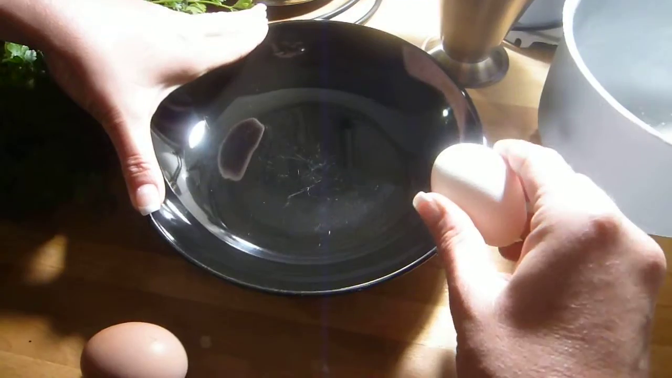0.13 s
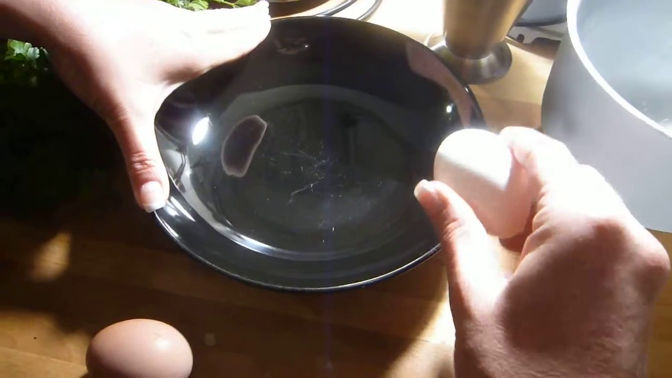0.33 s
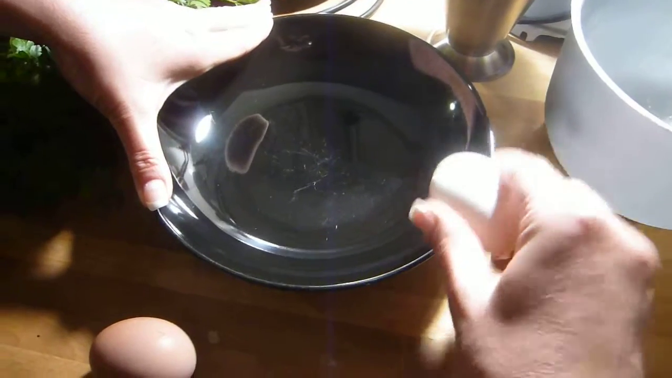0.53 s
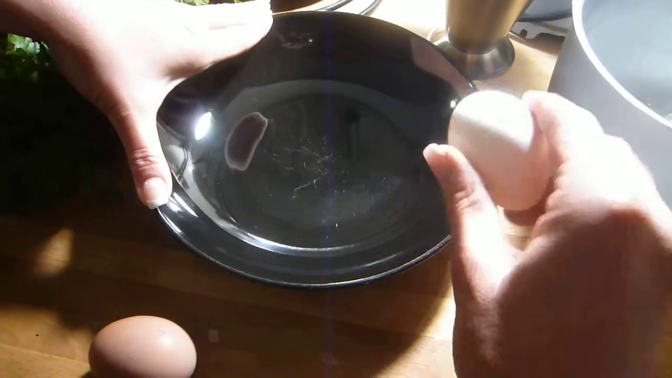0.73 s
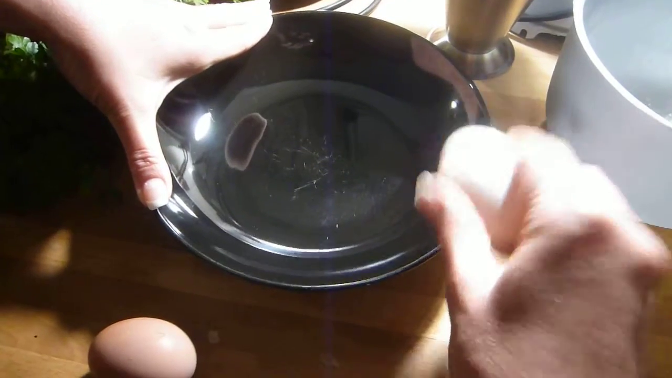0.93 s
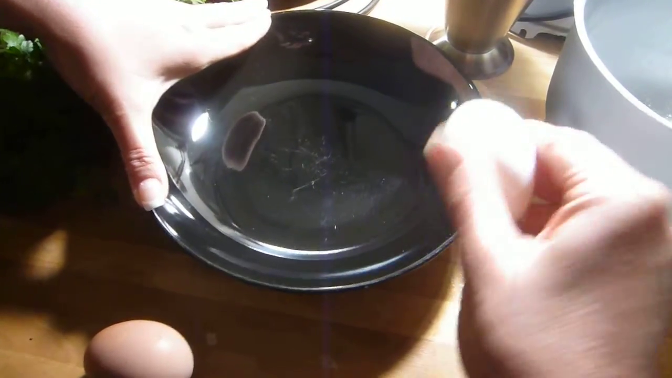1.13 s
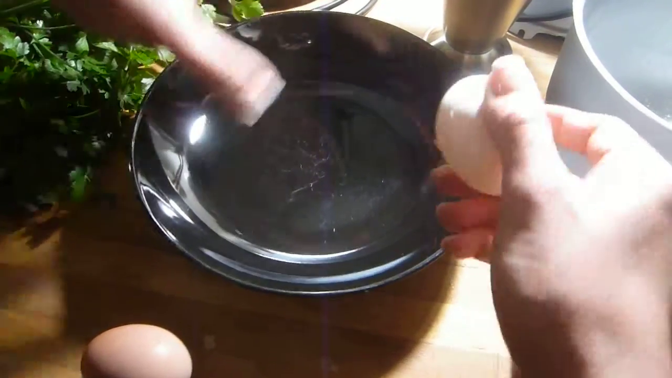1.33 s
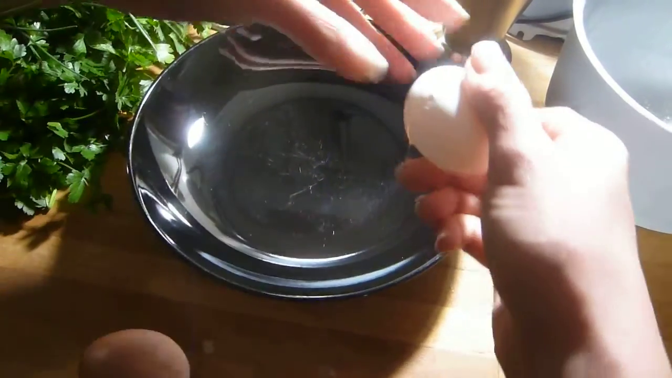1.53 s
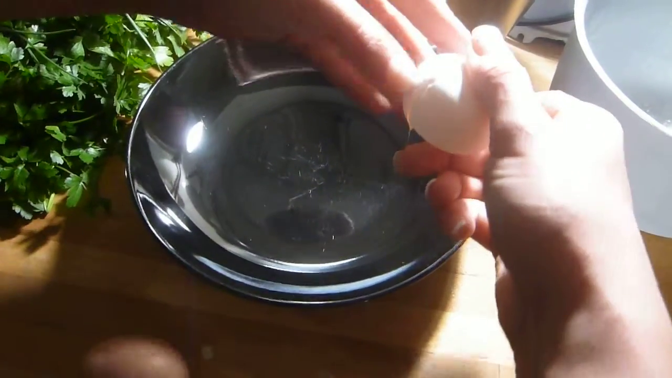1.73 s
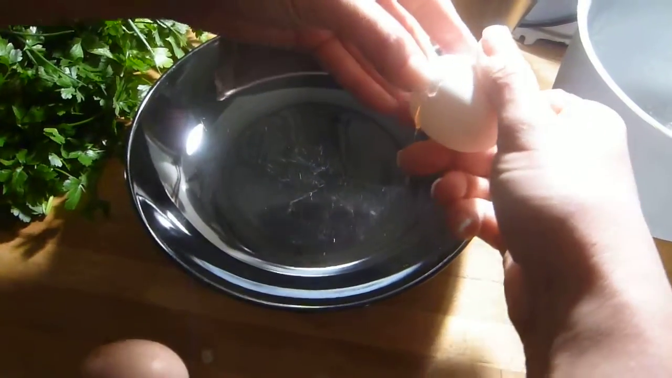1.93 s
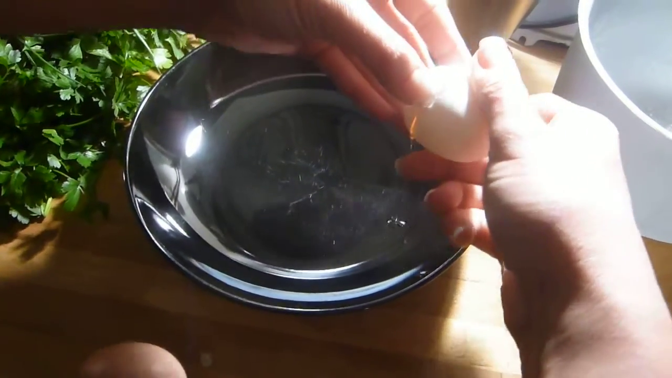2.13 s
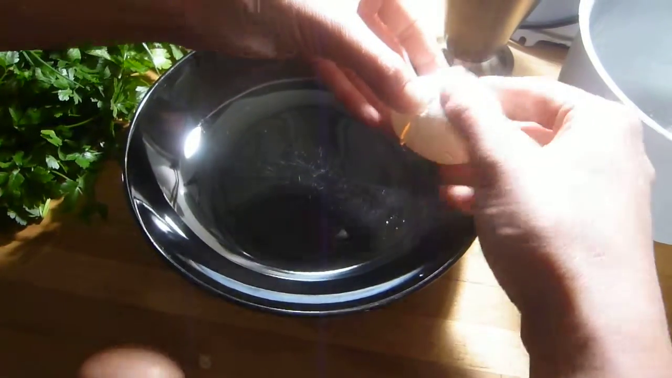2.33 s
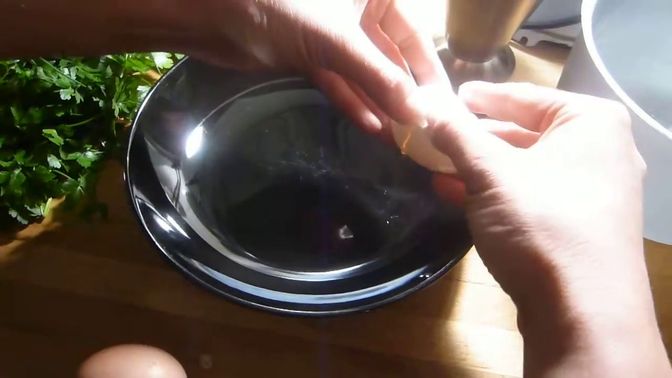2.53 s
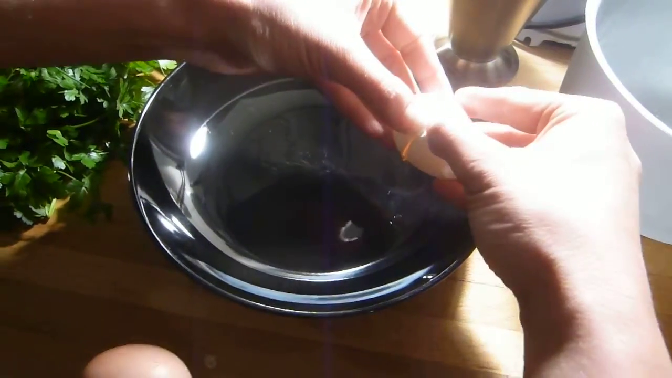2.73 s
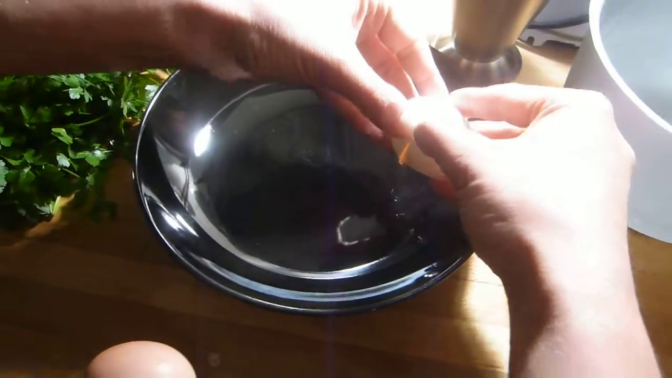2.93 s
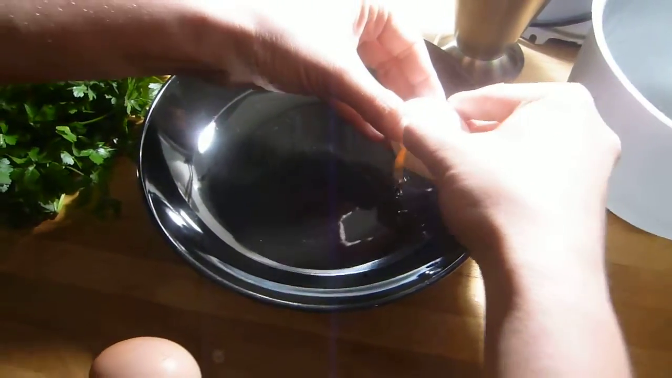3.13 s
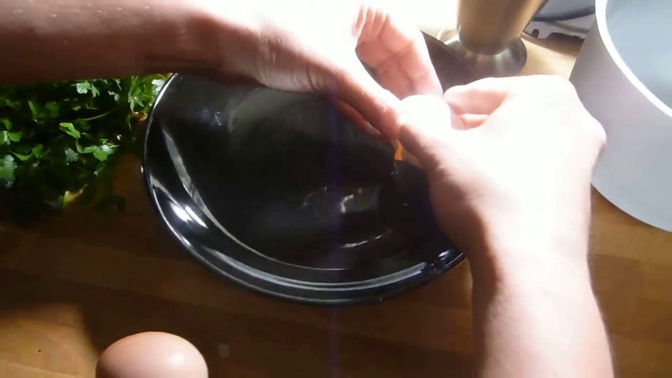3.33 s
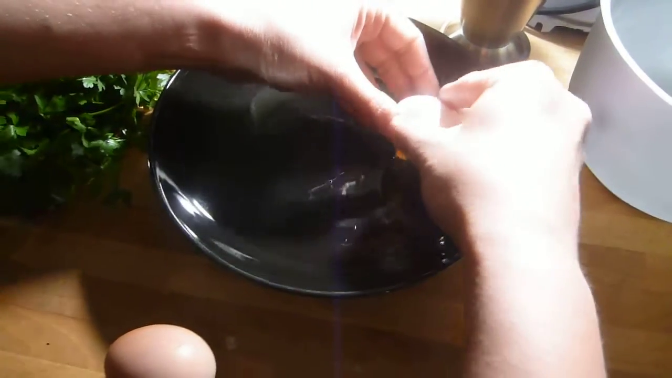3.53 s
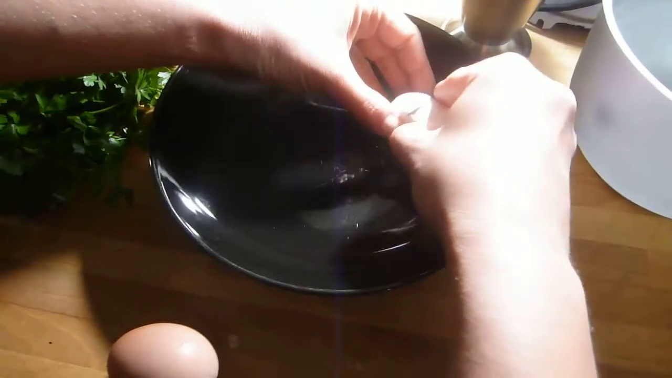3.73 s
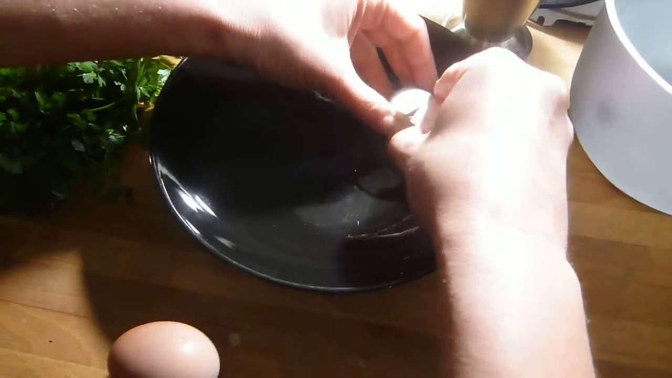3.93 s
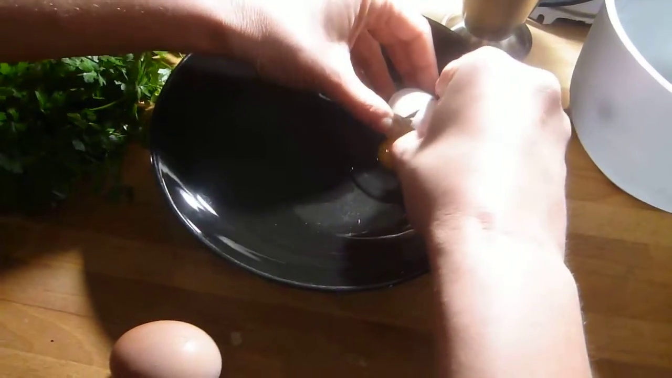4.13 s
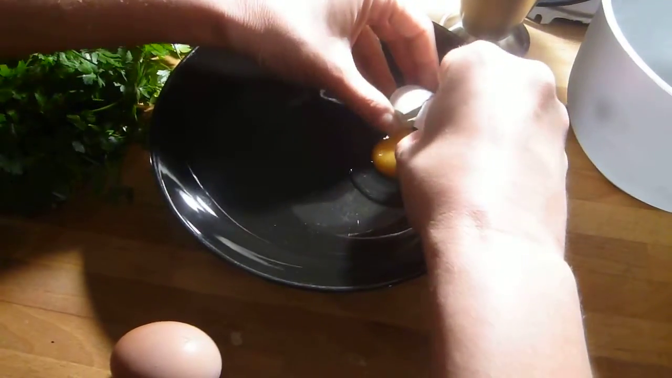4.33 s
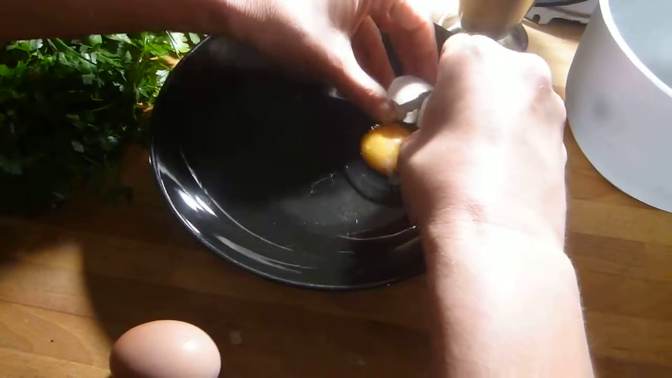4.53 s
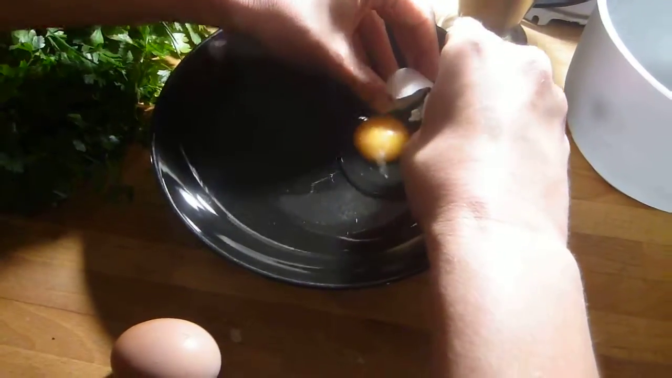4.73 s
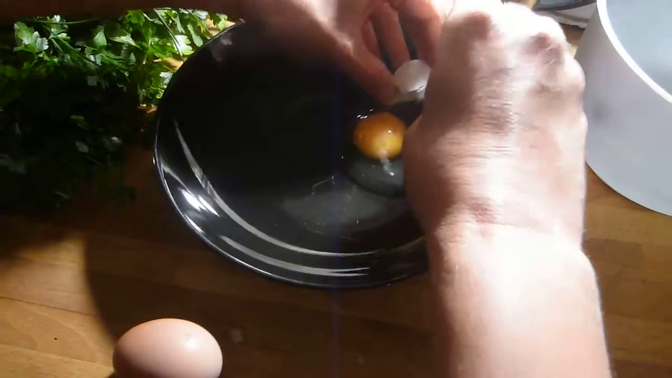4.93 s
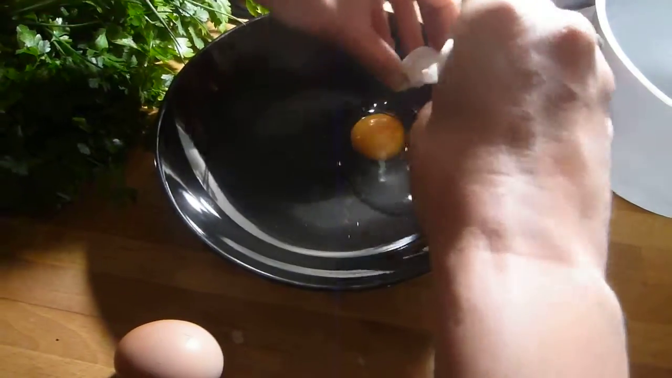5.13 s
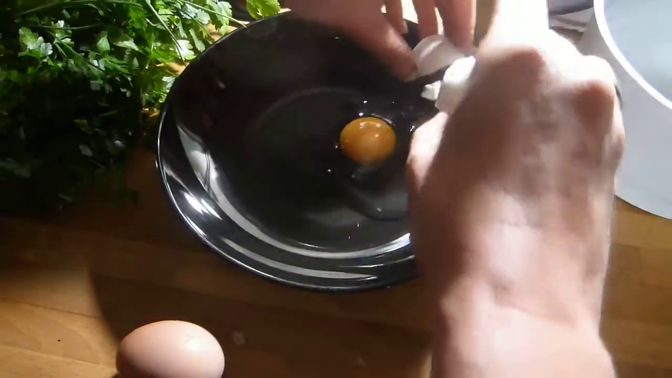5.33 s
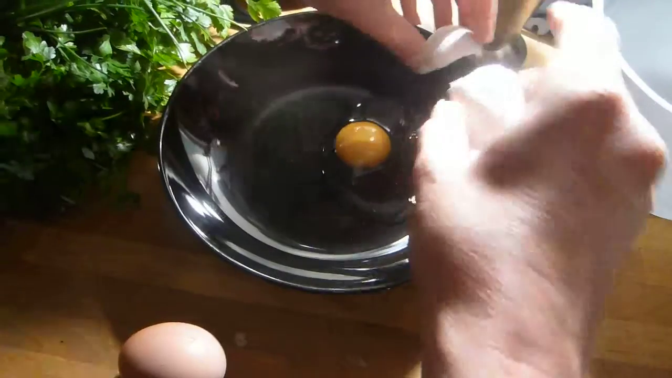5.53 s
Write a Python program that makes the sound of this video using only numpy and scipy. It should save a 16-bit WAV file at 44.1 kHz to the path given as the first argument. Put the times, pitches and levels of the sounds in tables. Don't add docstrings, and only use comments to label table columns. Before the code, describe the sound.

Two sharp, crunchy egg knocks ring through wood, followed by handling thumps and a brief burst of brittle shell cracking.

```python
import sys
import numpy as np
from scipy import signal
from scipy.io import wavfile

SR = 44100
rng = np.random.default_rng(int(sys.argv[2]) if len(sys.argv) > 2 else 0)


def wav_record(signal):
    frames = np.transpose(np.atleast_2d(signal))
    bounded = np.clip(frames, -1, 1)
    quanta = np.round(bounded * 32767).astype(np.int16)
    wavfile.write(sys.argv[1], SR, quanta)


def volts(x):
    e = np.asarray(x, float) / 20
    return 10 ** e


N = 245637


def rms_one(x):
    return x / np.sqrt(np.mean(x ** 2) + 1e-20)


def at_hz(points, hz):
    curve_hz, value = np.array(points).T
    return np.interp(np.log(hz), np.log(curve_hz), value)


def drift(rate_hz):
    knots_per_s = 200
    knots = rng.standard_normal(int(N / SR * knots_per_s) + 400)
    r = np.exp(-2 * np.pi * rate_hz / knots_per_s)
    slow = rms_one(signal.lfilter([1], [1, -2 * r, r * r], knots)[300:])
    return np.interp(np.arange(N) / SR * knots_per_s, np.arange(len(slow)), slow)


def ring(clicks, hz, t60_s):
    r = volts(-60 / (max(t60_s, .001) * SR))
    w = 2 * np.pi * hz / SR
    return signal.lfilter([0, np.sin(w)], [1, -2 * r * np.cos(w), r * r], clicks + 1e-18)


def modes_ring(clicks, modes):
    return sum((-1) ** k * volts(db) * ring(clicks, hz, t60_s) for k, (hz, t60_s, db) in enumerate(modes))


def high_pass(x, hz):
    return signal.sosfilt(signal.butter(2, hz, "high", fs=SR, output="sos"), x)


def add(out, start_s, piece):
    i = int(start_s * SR)
    out[i:i + len(piece)] += piece[:N - i]


def bands(spectrum, size, gain_at):
    edges = 25 * 2 ** np.arange(0, 8.7, 1 / 3)
    centres = np.sqrt(edges[1:] * edges[:-1])
    levels = volts(at_hz(spectrum, centres))
    levels = levels / np.sqrt(np.sum(levels ** 2 * np.diff(edges)) * 2 / SR)
    white = rng.standard_normal((2, size + 4000))
    out = np.zeros(size)
    for k, hz in enumerate(centres):
        sos = signal.butter(2, edges[k:k + 2], "band", fs=SR, output="sos")
        out += levels[k] * gain_at(hz) * signal.sosfilt(sos, white[k % 2])[-size:]
    return out


# pitch_hz, level_db (per Hz)
HISS_COLOUR = [(15, -34), (25, -1), (130, 3), (418, -14), (472, -10), (712, -9), (930, -22.5),
               (1030, -16.5), (1160, -17.5), (1280, -36.5), (1440, -12.5), (2460, -18), (6980, -26.5),
               (8270, -27.5), (10800, -71.5), (18200, -120)]


def hiss():
    together = drift(7.1)

    def lumps(hz):
        depth_db = 0.5 + 400 / (hz + 100)
        return volts(depth_db * (.5 * together + drift(15.0)))

    return volts(-54) * bands(HISS_COLOUR, N, lumps)


# start_s, level_db
HANDS = [(0, 1.5), (.14, 4.5), (.4, -5), (.65, 4.5), (0.951, -2), (1.2, 3.5), (1.45, -0.5), (1.7, 2.5),
         (2.1, 3.5), (3.0, 0.5), (3.699, 3.5), (3.85, -3), (4.0, 2.5), (4.42, -0.5), (4.52, -4), (4.7, -1),
         (5.3, 0.5), (5.57, 0.5)]


def hands_db():
    return np.interp(np.arange(N) / SR, *np.transpose(HANDS))


# pitch_hz, level_db (per Hz)
RUMBLE_COLOUR = [(60, -35), (150, 4), (250, -2), (400, -0.5), (600, -5.5), (1200, -40)]


def rumble():
    lumps = bands(RUMBLE_COLOUR, N, lambda hz: volts(3.67 * drift(2.5)))
    return volts(-61.5 + 1.3 * hands_db()) * lumps


# pitch_hz, t60_s, level_db
CASING_MODES = [(863, 0.019, -1.5), (903, 0.053, -5), (1140, 0.034, -5.5), (1480, 0.017, -3.5),
                (1852, 0.034, -11), (2146, 0.033, -13.5)]


def rubbing():
    born = rng.random(N) < 900 * volts(8.0 * drift(16.0)) / SR
    strength = volts(4.1 * np.minimum(rng.exponential(1, N), 4))
    slips = born * strength * rng.choice([-1, 1], N)
    dealt = rng.integers(0, len(CASING_MODES), N)
    rubbed = np.zeros(N)
    for k, (hz, t60_s, db) in enumerate(CASING_MODES):
        rubbed += volts(db) * ring(slips * (dealt == k), hz, t60_s)
    return volts(-59 + hands_db()) * rms_one(rubbed)


# start_s, peak_db, pitch_hz, second_slip_wait_s (0 = none)
CREAKS = [(.152, -38.5, 1100, .036), (.286, -38, 1044, .056), (.443, -38.5, 896, 0),
          (.848, -39.5, 1070, 0.044), (1.39, -41, 1170, 0.025), (1.486, -41.5, 1080, 0.06),
          (1.726, -43, 1140, 0.022), (1.871, -39, 992, 0.046), (1.965, -40, 980, 0.038),
          (2.314, -44, 870, .054), (2.451, -39.5, 1130, 0.051), (2.79, -42, 1150, 0.07),
          (3.014, -38.5, 899, 0.017), (3.247, -39, 890, .045), (3.36, -37.5, 1180, 0.059),
          (3.599, -39, 1480, 0.066), (3.91, -36.5, 980, 0.059), (3.998, -36.5, 956, 0.048),
          (4.17, -35.5, 1130, 0.029), (4.291, -41, 930, 0.031), (4.301, -30, 897, .049),
          (4.386, -37, 980, .03), (4.44, -40.5, 960, .016), (4.585, -39.5, 1080, .026),
          (4.65, -36.5, 950, .046), (4.791, -38, 977, 0.038), (4.944, -34, 892, 0.044),
          (5.076, -35.5, 1110, 0.084), (5.317, -40, 1110, 0.011), (5.434, -38, 970, 0.059)]


def creaks():
    out = np.zeros(N)
    again = [(s + wait_s, peak_db - 2, hz, 0) for s, peak_db, hz, wait_s in CREAKS if wait_s]
    for start_s, peak_db, hz, _ in CREAKS + again:
        noise = rng.standard_normal(3000)
        t = np.arange(len(noise)) / SR
        slip = noise * np.abs(noise) * (1 - np.exp(-t / 0.00024)) * np.exp(-(t / 0.011) ** 2)
        creak = volts(2.0) * ring(slip, hz, 0.033) + modes_ring(slip, CASING_MODES)
        add(out, start_s - .001, volts(peak_db - 3.0) * creak / np.abs(creak).max())
    return out


def casing():
    return high_pass(rubbing() + creaks(), 650)


# start_s, level_db, pitch_hz, length_s
HUMS = [
    (2.68, -51, 395, .09),
    (4.7, -52, 385, .09),
    (4.66, -55, 620, .05),
]


def hums():
    out, t = np.zeros(N), np.arange(SR // 4) / SR
    for start_s, level_db, hz, length_s in HUMS:
        swell = np.sin(np.pi * np.minimum(t / length_s, 1))
        add(out, start_s, volts(level_db) * swell * np.sin(2 * np.pi * hz * t))
    return out


# start_s, peak_db, pitch_hz, ringing_cycles
THUMPS = [(0.053, -35, 120, 3), (0.066, -31.5, 151, 6), (0.124, -32, 110, 4), (0.833, -40.5, 117, 5),
          (1.307, -19.5, 266, 2.7), (1.418, -46, 102, 6.9), (1.798, -42, 73.6, 3.3),
          (1.921, -40, 78.6, 3.1), (2.231, -36.5, 128, 4.8), (2.475, -25.5, 194.4, 6.6),
          (2.588, -43.5, 232, 9.4), (2.657, -43.5, 151, 5.5), (3.079, -26.5, 158, 7),
          (3.225, -31.5, 176, 6.8), (3.244, -25, 138, 6), (3.308, -43.5, 141, 7.7), (3.408, -32, 125, 3.8),
          (3.585, -38, 151, 5.1), (3.769, -43, 91.5, 4.5), (4.076, -30.5, 188.8, 3.5),
          (4.11, -32.5, 202, 3.6), (4.715, -39, 154, 8.7), (4.747, -39.5, 113, 6), (5.008, -32, 152, 4.3),
          (5.397, -28.5, 227, 4.9), (5.411, -44, 156, 4.3)]


def thumps():
    out, t = np.zeros(N), np.arange(SR // 4) / SR
    for start_s, peak_db, hz, cycles in THUMPS:
        swell = (1 - np.exp(-t / 0.0045)) * volts(-60 * t * hz / max(cycles, 1))
        turns = hz * (t + 0.00085 * (1 - np.exp(-t / 0.0013)))
        wave = np.sin(2 * np.pi * turns) + 0.46 * np.sin(2 * np.pi * 0.54 * turns)
        wave += 0.16 * np.sin(2 * np.pi * 2.06 * turns)
        add(out, start_s + 0.00407, volts(peak_db + 11.5) * swell * wave)
    return out


def kitchen(x):
    t = np.arange(SR // 2) / SR
    t60_s, first_echo_s = 0.29, .004
    echo = rng.standard_normal(len(t)) * volts(-60 * t / t60_s) * (t > first_echo_s)
    echo = signal.lfilter([.4], [1, -.6], echo)
    return signal.fftconvolve(x, echo / np.sqrt(np.sum(echo ** 2)))[:N]


# pitch_hz, t60_s, level_db
SHELL_MODES = [(447, 0.053, -8.5), (615, 0.016, -3.5), (938, 0.026, 2.5), (1290, 0.021, -3),
               (2105, 0.014, -1.5)]
# start_s, peak_db, pitch_hz
SNAPS = [(0.0895, -47.5, 3870), (0.5035, -44, 4170), (0.5502, -40, 3370), (0.679, -48, 3260),
         (2.0503, -49, 3440), (2.0749, -39, 4550), (2.0988, -41, 4490), (3.0626, -43, 3200),
         (3.068, -22, 4460), (3.0754, -40, 2580), (3.0806, -16.5, 2940), (3.0862, -25.5, 3300),
         (3.0946, -25, 3050), (3.1055, -33, 4200), (3.1136, -34.5, 3600), (3.1165, -38, 4830),
         (3.1261, -24, 5240), (3.131, -35.5, 3000), (3.144, -39, 3400), (3.1732, -38.5, 5100),
         (3.48, -45.5, 2650), (3.576, -40, 2730), (3.591, -38, 5000), (3.617, -29, 3950),
         (3.626, -41, 3740), (3.686, -47.5, 3240), (5.221, -38.5, 2640), (5.3507, -43, 2700)]


def snaps():
    out = np.zeros(N)
    for start_s, peak_db, hz in SNAPS:
        noise = rng.standard_normal(2000)
        t = np.arange(len(noise)) / SR
        clicks = 0.034 * noise * np.abs(noise) * np.exp(-t / 0.0076)
        clicks[0] = -1
        second_click_s = .0009 * (1 + .3 * abs(noise[0]))
        clicks[int(second_click_s * SR)] += .7
        bright = ring(clicks, hz, .0022) + .7 * ring(clicks, 3000, .002)
        bright += volts(-2.5) * ring(clicks, 6600, 0.0017) - volts(3.0) * ring(clicks, 5870, 0.00089)
        bright += volts(-22.0) * ring(clicks, hz, .018)
        body_db = -7.5 - max(hz - 3300, 0) / 1000
        body = volts(body_db) * modes_ring(clicks, SHELL_MODES)
        add(out, start_s + .0006, volts(peak_db - 1.0) * (bright + body))
    return out


WORKTOP_HZ = [46, 142, 204, 233, 276, 322, 400, 424, 480, 535, 620, 655, 734, 790, 850, 955, 1050, 1110,
              1190, 1252, 1440]
# t60_s, first_knock_db, second_knock_db, drop_db
WORKTOP = [(0.44, -30.5, -31.5, -51.5), (0.37, -35.5, -24.5, -27), (0.45, -22, -16.5, -30),
           (0.4, -14.5, -20.5, -23.5), (0.37, -16.5, -43, -24), (.4, -34.5, -26.5, -31.5),
           (0.24, -19, -9, -25.5), (0.14, -6.5, -13, -16), (0.044, -13, -11.5, -46), (0.11, -8, -11.5, -27),
           (0.11, -19.5, -19, -21.5), (0.22, -16, -35.5, -31), (0.072, -18, -14.5, -32),
           (0.047, -8.5, -11.5, -23.5), (0.076, -26, -36, -41), (0.2, -21.5, -26.5, -45.5),
           (0.45, -37, -45, -65), (0.25, -32, -49.5, -66.5), (0.29, -35.5, -50, -66),
           (0.034, -7, -16.5, -57), (0.087, -24.5, -54.5, -71)]
BOWL_HZ = [580, 1776, 2062, 2119, 2985, 4035, 5160]
# t60_s, first_knock_db, second_knock_db, drop_db
BOWL = [(1.0, -52, -48, -42), (.3, -54, -50, -80), (.3, -35, -36, -80), (.2, -36, -35, -80),
        (.28, -42, -48, -85), (.24, -46, -50, -90), (.13, -60, -51, -90)]


def wood_and_bowl(out, k, start_s, delay_s, spread_s, contact_s):
    t = np.arange(SR) / SR
    signs = rng.choice([-1, 1], len(WORKTOP + BOWL))
    lags = delay_s + rng.random(len(signs)) * spread_s
    contact = (1 - np.exp(-t / contact_s)) ** 2
    for hz, (t60_s, *level_db), sign, lag_s in zip(WORKTOP_HZ + BOWL_HZ, WORKTOP + BOWL, signs, lags):
        decay = volts(level_db[k] - 60 * t / t60_s)
        add(out, start_s + lag_s, sign * contact * decay * np.sin(2 * np.pi * hz * t))
    for hz, (t60_s, *level_db), lag_s in zip(BOWL_HZ[3:], BOWL[3:], lags):
        decay = volts(level_db[k] + 1.5 - 60 * t / (t60_s * .45))
        add(out, start_s + lag_s, contact * decay * np.sin(2 * np.pi * hz * 1.014 * t))


# pitch_hz, level_db (per Hz)
CRUNCH_FIRST = [(180, -42), (300, -7), (653, -2), (1400, -23), (1800, -11), (3550, -20.5), (5090, -23),
                (6810, -42.5), (8270, -59), (10800, -101), (18200, -120)]
# pitch_hz, level_db (per Hz)
CRUNCH_LATER = [(180, -41), (300, -13), (750, -15.5), (1270, -12), (2180, -9), (3450, -23.5), (3960, -14),
                (5230, -27), (8270, -60), (10800, -82), (18200, -120)]


def crunch(colour, crunch_s):
    t = np.arange(SR) / SR
    grains = volts(3.0 * rng.standard_normal(200))[(t * 1500).astype(int) % 200]
    burst = np.where(t < crunch_s, .5 + .7 * t / crunch_s, np.exp(-(t - crunch_s) / .0035))
    return grains * burst * bands(colour, SR, np.ones_like)


# pitch_hz, level_db (per Hz)
TAIL = [(24, -54.5), (40, -27.5), (106, -25.5), (269, -6), (668, -12), (746, -18), (1270, -25), (1550, -67),
        (2120, -47.5), (2360, -50.5), (8000, -84), (10400, -105), (17600, -120)]
# pitch_hz, t60_s
TAIL_T60 = [(40, 1), (200, 0.44), (700, 0.32), (1500, 0.19), (8000, 0.066)]


def tail(spread_s, cut_hz):
    t = np.arange(SR) / SR

    def dying(hz):
        return volts(-60 * t / at_hz(TAIL_T60, hz)) / (1 + (hz / cut_hz) ** 4)

    return (1 - np.exp(-t / spread_s)) * bands(TAIL, SR, dying)


# start_s, crunch_db, tail_db, tail_cut_hz
KNOCKS = [
    (.4849, -16, -13.5, 7000),
    (.9860, -25, -17, 4990),
    (1.1950, -67, -24, 544),
]
# crunch_s, main_blow_delay_s, spread_s, contact_s
LANDINGS = [
    (0.0022, 0.0014, .002, 0.00036),
    (0.0078, 0.0029, .005, 0.000097),
    (.003, .001, 0.0018, 0.00064),
]


def knocks():
    out = np.zeros(N)
    for k, (start_s, crunch_db, tail_db, cut_hz) in enumerate(KNOCKS):
        crunch_s, delay_s, spread_s, contact_s = LANDINGS[k]
        wood_and_bowl(out, k, start_s, delay_s, spread_s, contact_s)
        colour = CRUNCH_LATER if k else CRUNCH_FIRST
        add(out, start_s, volts(crunch_db) * crunch(colour, crunch_s))
        add(out, start_s + delay_s, volts(tail_db) * tail(spread_s, cut_hz))
    return high_pass(out, 38)


def scene():
    background = hiss() + rumble()
    handling = casing() + hums() + thumps()
    shell = snaps()
    egg = shell + volts(-18) * kitchen(shell) + knocks()
    return (background + handling + egg)[None]


def roll_off(x):
    return signal.sosfilt(signal.butter(12, 8420, fs=SR, output="sos"), x)


def record(dry):
    steep_cut = signal.butter(10, 7700, fs=SR, output="sos")
    x = signal.sosfilt(steep_cut, dry) + volts(-36.0) * dry
    clip_top = .7
    return roll_off(np.clip(x, -clip_top, clip_top))


dry = scene()
out = record(dry)
wav_record(out)
```